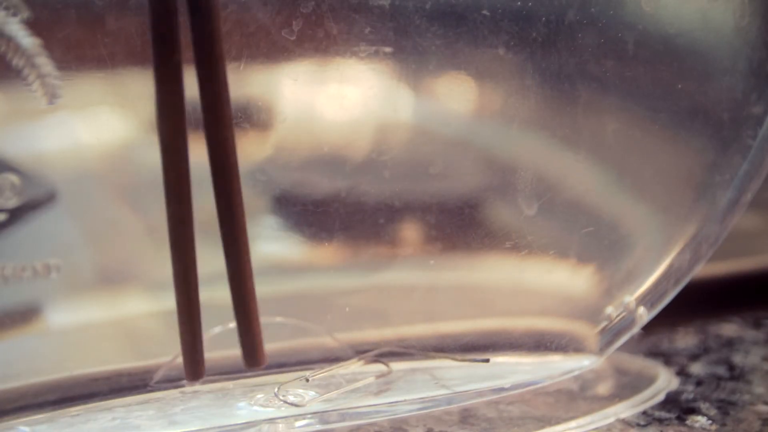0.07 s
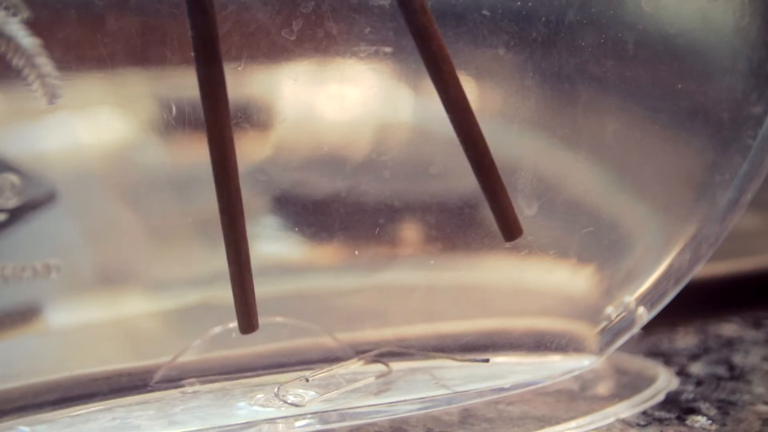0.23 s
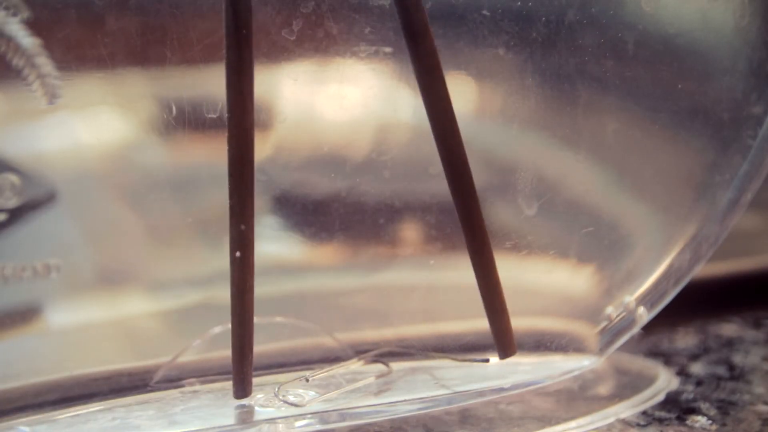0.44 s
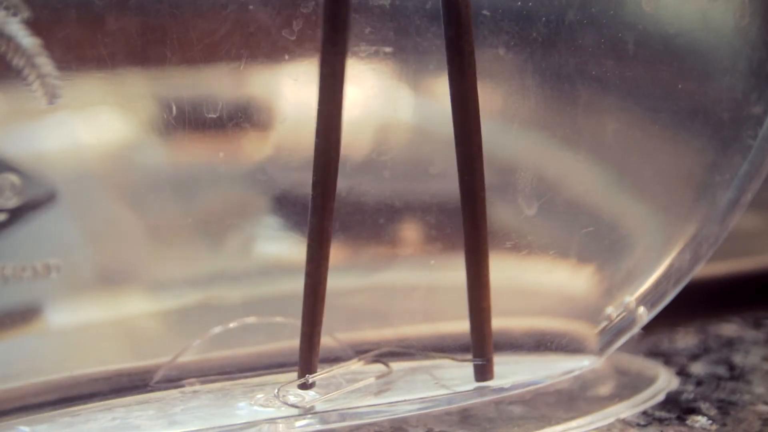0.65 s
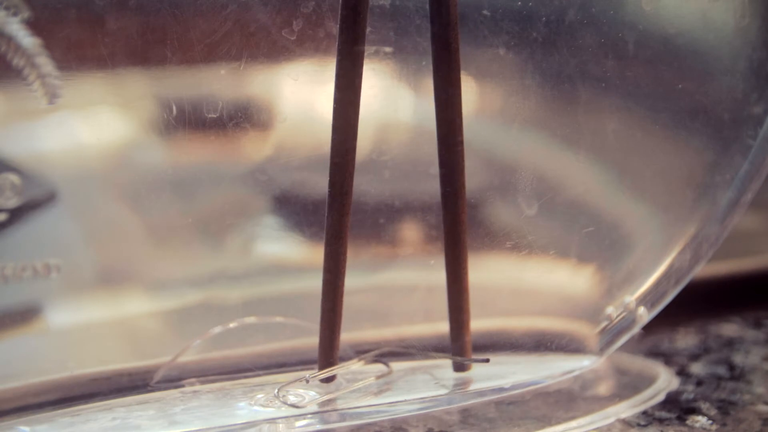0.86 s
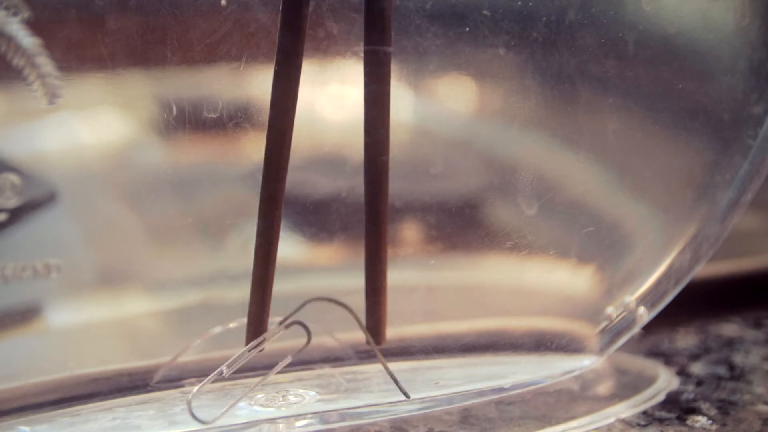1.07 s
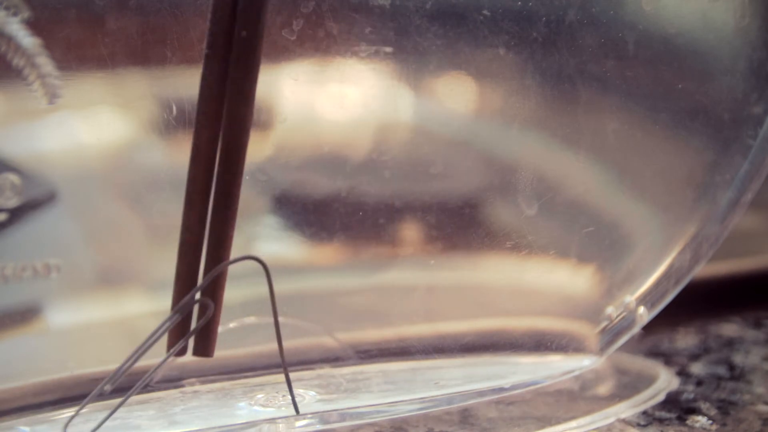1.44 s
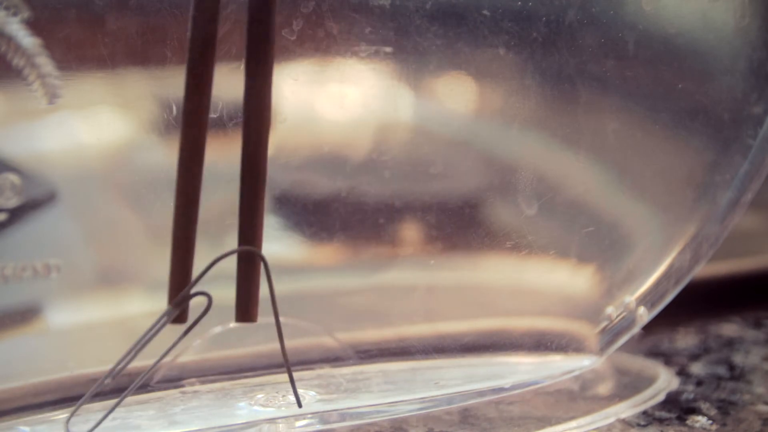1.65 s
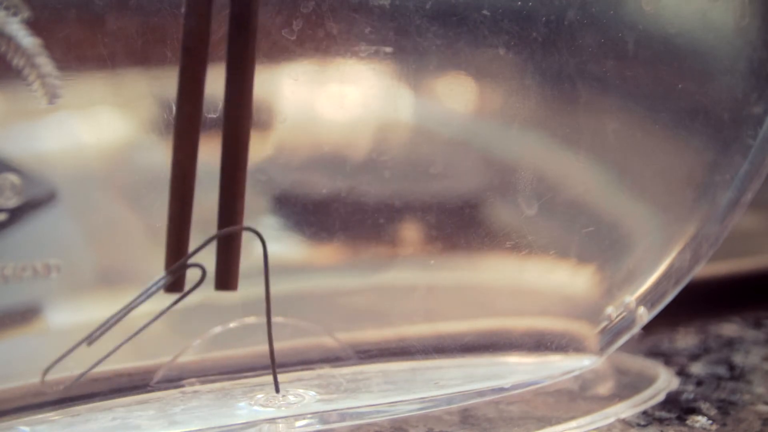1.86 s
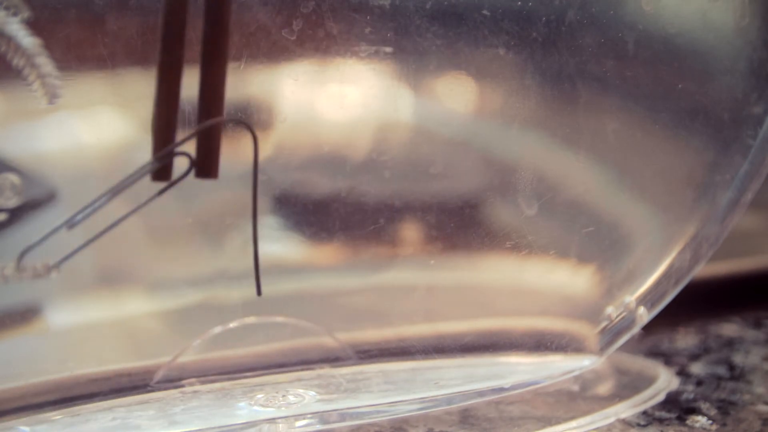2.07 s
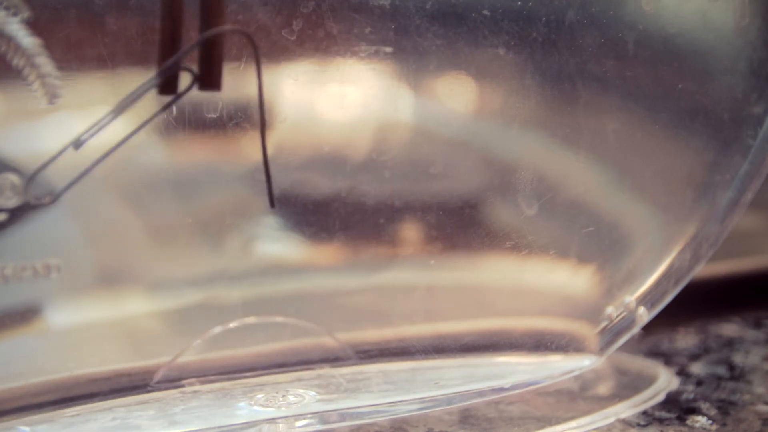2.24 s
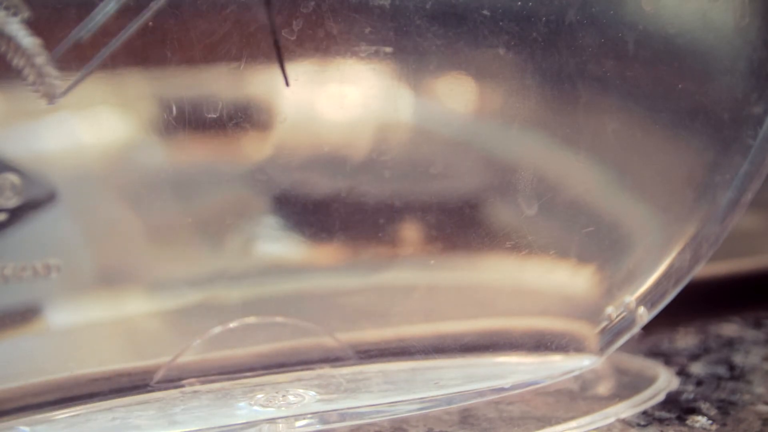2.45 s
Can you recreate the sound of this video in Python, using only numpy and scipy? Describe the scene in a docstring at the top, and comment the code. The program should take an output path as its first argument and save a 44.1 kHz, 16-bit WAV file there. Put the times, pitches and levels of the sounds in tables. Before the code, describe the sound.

Chopsticks tap a glass bowl while a paper clip clinks and scrapes against it.

```python
"""Two wooden chopsticks fish a bent paper clip out of a glass bowl, close up in a small room.
The sticks clack together, knock on the bottom and slide; the wire ticks, scrapes and rings against
the glass, then swings against the sticks. A contact is damped modes plus a short noise burst; sliding
drives both with rough noise. Handling sets off a low boom, and the room gives every touch a short tail."""
import sys
import numpy as np
from scipy import signal
from scipy.fft import rfft, irfft
from scipy.io import wavfile
from scipy.ndimage import uniform_filter1d

SR = 44100
rng = np.random.default_rng(int(sys.argv[2]) if len(sys.argv) > 2 else 0)


def inscribe(sig):
    """Save sig as 16-bit PCM at rate SR to the path in sys.argv[1].

    A 1-D sig is mono; a 2-D sig holds one channel per row.
    Samples are clipped to [-1, 1] before scaling.
    """
    pcm = np.round(np.clip(np.atleast_2d(sig).T, -1, 1) * 32767)
    wavfile.write(sys.argv[1], SR, pcm.astype(np.int16))


N = 110250
RING_T = np.arange(SR) / SR

# Stick on stick. Each row: start in seconds, then level, bass and treble in dB.
STICK_CLACKS = [(0.2389, -5.5, -5.5, 5.5), (0.33, -17, 3, -10)]
# Tip on bowl. Each row: start in seconds, level, bass, presence and treble in dB, impulse share 0-1.
BOWL_KNOCKS = [(0.3884, -13, -1, 0.5, -4, 0.05), (0.429, -25, 4.5, -4.5, -27, 0.27),
               (0.5521, -14.5, -8.5, -15.5, -9, 0.55), (1.606, -38.5, 11, -8, -25, 0.06),
               (1.6844, -32.5, 12.5, 18.5, -2, 0), (1.892, -41, 7, -1, -8, 0.17)]
# Wire on glass, tip on wire. Each row: start in seconds, then level, bass, presence, treble, ring in dB.
WIRE_TICKS = [(0.6672, -25, 4.5, -0.5, -19, 0), (1.0437, -26.5, 9, 2.5, 0, -28),
              (1.052, -26, 5, 3.5, -38, -17), (1.148, -34, -1, 2, 2.5, 9.5), (1.162, -36, 2, -6, 8, -22),
              (1.1801, -21.5, -7.5, -6.5, 6.5, 13), (1.195, -19, -4, 4, -7.5, 2),
              (1.3694, -38.5, 6, 11, 4, 1), (1.3737, -27, -3, 8, 7, -10.5), (1.609, -21, 1.5, -1, -26, -2),
              (1.619, -20.5, 2.5, 0, -3, -3), (1.688, -39.5, -4, -2, 11, -11)]
TIP_CATCHES = [(0.5157, -37, 0, -3, 4, -3), (0.679, -40.5, -18, 4.5, 1, -21),
               (1.6894, -22.5, 7.5, 3.5, -16, -1.5), (1.693, -27.5, 9.5, 10.5, -45, 1)]
# Wire over glass, tips over glass and wire.
# Each row: start, swell and hold in seconds, then level, bass, presence and treble in dB.
WIRE_SCRAPES = [(1.045, 0.044, 0.078, -35, 9.5, -6.5, -18.5), (1.121, 0.02, 0.062, -29.5, -3.5, 4, -10),
                (1.602, 0.00068, 0.0048, -23.5, 4, -0.5, 6.5)]
TIP_SLIDES = [(0.514, 0.001, 0.038, -34, 2.5, 2, -11), (0.545, 0.0017, 0.011, -29.5, 1.5, 2, 0),
              (0.667, 0.004, 0.0088, -34, -9, 7.5, 9), (0.715, 0.0031, .008, -60, 23, 18.5, 22),
              (0.775, 0.02, 0.041, -44, 5, 0.5, 13.5), (0.878, 0.0011, 0.022, -42.5, 8.5, 3.5, 14),
              (0.90, 0.0018, 0.037, -43.5, 7, 3.5, -8), (1.47, 0.013, 0.011, -47.5, -4, 3.5, -28),
              (1.78, 0.021, 0.114, -50.5, -2, 4.5, -7), (2.0, 0.0068, 0.027, -44, -5, 1, -4),
              (2.03, .01, 0.181, -54, -7, 0, -5), (2.335, 0.0031, 0.14, -52, -36, 2, -3)]
# Lifted wire on the sticks. Each row: start in seconds, level and treble in dB, pitch ratio.
WIRE_SWINGS = [(1.8647, -37.5, 6.5, 1), (1.9146, -44.5, 6.5, 1), (1.933, -43.5, 9, 1),
               (1.9605, -41, -11, 0.82), (2.0182, -39.5, 11.5, 1)]
# Handling booms. Each row: start, swell and hold in seconds, level in dB.
HANDLING_BOOMS = [(1.032, 0.012, 0.23, -37.5), (1.61, .01, .03, -39.5), (1.675, 0.018, 0.012, -22.5),
                  (1.771, 0.0054, .11, -28), (1.918, 0.0098, 0.041, -35.5)]

# Modes of each body. Each row: frequency in Hz, level in dB, T60 in seconds.
STICK_RESONANCES = [(856, -25, .07), (1373, -18, .09), (1954, -19, .1), (2541, -22, .08), (3205, -7, .065),
                    (3295, -13, .06), (3350, 1.5, .026), (4124, -17, .055), (4210, -18, .045),
                    (4307, -16, .04), (6385, -19, .025), (8700, -31, .024)]
TIP_RESONANCES = [(375, -17, .22), (590, -20, .2), (770, -14, .16), (1040, -17, .18), (1497, -18, .16),
                  (1981, -13, .2), (2379, -16, .13), (2800, -11, .12), (3470, -12, .13)]
BOWL_RESONANCES = [(300, -21, .6), (808, -17, .22), (855, -20, .28), (919, -20, .18), (1016, -20, .16),
                   (1148, -18, .22), (1215, -15, .18), (1303, -16, .28), (1365, -19, .2), (1416, -17, .18),
                   (1516, -15, .18), (1878, -16, .2), (2000, -18, .16), (2340, -21, .16)]
WIRE_RESONANCES = [(1183, -26, .22), (2293, -23, .17), (2579, -22, .25), (2790, -21, .15), (2896, -21, .2),
                   (3215, -17.5, .2), (3312, -21, .18), (3456, -19.5, .32), (4064, -21, .2),
                   (4161, -24, .2), (4662, -22, .22), (6385, -21, .15), (6493, -21.5, .17),
                   (9006, -24, .14), (10677, -23, .11), (12462, -26, .15)]
HANGING_WIRE_RESONANCES = [(856, -14, .25), (2375, -2, .13), (3595, -3.5, .12), (4050, -15, .08)]
# Spectra of the dense vibration at a contact. Each row: frequency in Hz, level in dB.
STICK_SPECTRUM = [(100, -12.5), (330, 0.5), (460, -23), (700, 4.5), (1000, -6), (1320, 11.5), (1700, -10),
                  (3300, -3), (5000, -11.5), (8000, -20), (15000, -30)]
TIP_SPECTRUM = [(100, -1), (330, -10), (520, -13.5), (1000, 1.5), (1800, -4), (3200, 1), (4000, -4.5),
                (5200, -10.5), (8500, -12.5), (11000, -21), (15000, -29)]
BOWL_SPECTRUM = [(70, -10), (180, -4), (350, -13), (500, -16.5), (720, -6), (950, -2), (1400, 1.5),
                 (2200, -4), (3400, -12.5), (5000, -32), (8000, -48), (15000, -45)]
WIRE_SPECTRUM = [(100, -0.5), (250, -5), (380, -0.5), (560, -12.5), (1100, 1.5), (2000, -2.5), (3300, 2.5),
                 (5300, -7.5), (6500, -2.5), (10000, -5), (15000, -4)]
# Room reverberation. Each row: frequency in Hz, level in dB, T60 in seconds.
ROOM_DECAY = [(100, -6.5, 0.56), (252, -2, 0.73), (550, -3.5, 0.51), (1280, -1.5, 0.29), (2850, -7, 0.29),
              (5800, -8.5, 0.44), (14000, -17, 0.23)]
# Spectra of room tone and handling rumble. Each row: frequency in Hz, level in dB.
ROOM_TONE_SPECTRUM = [(20, -12.5), (45, 2.5), (80, -9.5), (120, -3), (180, -18), (300, -21), (500, -25),
                      (1000, -24.5), (2000, -27.5), (3200, -25), (5000, -41), (9000, -42.5), (15500, -40.5)]
RUMBLE_SPECTRUM = [(25, -17), (80, -4), (200, -27), (600, -62), (2000, -80)]


def amp(db):
    """Decibels to gain."""
    return 10 ** (np.asarray(db) / 20)


def unit_rms(x):
    """Scale to RMS 1."""
    return x / np.sqrt(np.mean(x ** 2))


def log_interp(hz, points_hz, values):
    """Interpolate on a log-frequency axis."""
    return np.interp(np.log(hz + 1e-3), np.log(points_hz), values)


def convolve(x, response):
    """Convolve, keeping the length of x."""
    return signal.fftconvolve(x, response)[:len(x)]


def min_phase(spectrum, size=4096):
    """Minimum-phase impulse response of a (Hz, dB) curve."""
    hz, db = np.array(spectrum).T
    gain = amp(log_interp(np.fft.rfftfreq(size, 1 / SR), hz, db))
    cepstrum = irfft(np.log(gain))
    cepstrum[1:size // 2] *= 2
    cepstrum[size // 2 + 1:] = 0
    return irfft(np.exp(rfft(cepstrum)))


def tone(x, bass_db, presence_db, treble_db):
    """Colour given by the place and hardness of a contact."""
    curve = [(350, bass_db), (1100, 0), (3000, presence_db), (4500, presence_db), (11000, treble_db)]
    return convolve(x, min_phase(curve))


def add(out, start_s, x):
    """Mix x into out at start_s."""
    i = int(start_s * SR)
    out[i:i + len(x)] += x[:N - i]


def envelope(swell_s, hold_s, release_s):
    """Linear swell, hold, exponential release."""
    release = np.exp(-np.maximum(RING_T - swell_s - hold_s, 0) / release_s)
    return np.minimum(RING_T / swell_s, 1) * release


def fade(t60_s):
    """Free decay."""
    return np.exp(-np.log(1000) * RING_T / t60_s)


def ring(modes, scatter_db=2):
    """Damped modes of alternating sign; levels scatter with the place of contact."""
    offsets_db = scatter_db * rng.standard_normal(len(modes))
    return sum((-1) ** k * amp(db + offsets_db[k]) * fade(t60_s) * np.sin(2 * np.pi * hz * RING_T)
               for k, (hz, db, t60_s) in enumerate(modes))


def crack(spectrum, t60_s, impulse_share=0.11, damping_hz=5800):
    """An impulse, then dense vibration that dies quickly, treble first."""
    noise = rng.standard_normal(SR)
    low = signal.sosfiltfilt(signal.butter(2, damping_hz, fs=SR, output="sos"), noise)
    burst = low * fade(t60_s) + (noise - low) * fade(0.55 * t60_s)
    energy = np.sum(burst ** 2)
    burst *= np.sqrt(1 - impulse_share)
    burst[0] += np.sqrt(impulse_share * energy)
    body = min_phase(spectrum)
    return convolve(burst, body / np.linalg.norm(body))


def rub(strokes, modes, spectrum, crack_t60_s, roughness_db=0.5):
    """Sliding: a dense run of tiny uneven slips excites the body."""
    out = np.zeros(N)
    for start_s, swell_s, hold_s, db, *tone_db in strokes:
        slips = unit_rms(rng.standard_normal(SR) * amp(roughness_db * rng.standard_normal(SR)))
        force = slips * envelope(swell_s, hold_s, release_s=0.0031)
        body = ring(modes) + crack(spectrum, crack_t60_s)
        slide = convolve(force, body / np.linalg.norm(body))
        add(out, start_s, amp(db) * tone(slide, *tone_db))
    return out


def room_tone(level_db=-46.5):
    """Quiet steady noise, strongest in the bass."""
    return amp(level_db) * unit_rms(convolve(rng.standard_normal(N), min_phase(ROOM_TONE_SPECTRUM)))


def room_tail(x, onset_s=0.011):
    """Diffuse echoes in half-octave bands; the bass stays longest."""
    hz, db, t60_s = np.array(ROOM_DECAY).T
    noise_bins, bin_hz = rfft(rng.standard_normal(SR)), np.fft.rfftfreq(SR, 1 / SR)
    tail = np.zeros(SR)
    for low_hz in 50 * 2 ** (np.arange(17) / 2):
        centre_hz = low_hz * 2 ** 0.25
        decay = fade(log_interp(centre_hz, hz, t60_s))
        band = irfft(noise_bins * ((bin_hz >= low_hz) & (bin_hz < low_hz * np.sqrt(2))))
        tail += amp(log_interp(centre_hz, hz, db)) * band * decay / np.linalg.norm(decay)
    return convolve(x, tail * np.minimum(RING_T / onset_s, 1))


def handling_booms(boom_hz=47.3, wander_depth=0.11, rumble_db=-14.5):
    """A wavering low resonance with rumble as things are pushed about."""
    out = np.zeros(N)
    for start_s, swell_s, hold_s, db in HANDLING_BOOMS:
        wander = unit_rms(uniform_filter1d(rng.standard_normal(SR), size=2200))
        pitch_hz = boom_hz * (1 + wander_depth * wander)
        rumble = unit_rms(convolve(rng.standard_normal(SR), min_phase(RUMBLE_SPECTRUM)))
        boom = np.sin(2 * np.pi * np.cumsum(pitch_hz) / SR) + amp(rumble_db) * rumble
        add(out, start_s, amp(db) * envelope(swell_s, hold_s, release_s=0.031) * boom)
    return out


def hanging_wire(crack_db=-1.5, swell_s=0.0017):
    """The lifted paper clip grazes the sticks and rings thinly; pitch shifts with the grip."""
    out = np.zeros(N)
    for start_s, db, treble_db, pitch_ratio in WIRE_SWINGS:
        modes = [(hz * pitch_ratio, mode_db, t60_s) for hz, mode_db, t60_s in HANGING_WIRE_RESONANCES]
        tick = ring(modes) + amp(crack_db) * crack(TIP_SPECTRUM, t60_s=0.084)
        tick *= np.minimum(RING_T / swell_s, 1)
        add(out, start_s, amp(db) * tone(tick, bass_db=0, presence_db=3, treble_db=treble_db))
    return out


def stick_tips(crack_t60_s=0.075):
    """Wooden tips slide and catch on the wire; most catches ring briefly, one is a dry tick."""
    out = rub(TIP_SLIDES, TIP_RESONANCES, TIP_SPECTRUM, crack_t60_s)
    for start_s, db, *tone_db, ring_db in TIP_CATCHES:
        catch = amp(ring_db) * ring(TIP_RESONANCES) + crack(TIP_SPECTRUM, crack_t60_s)
        add(out, start_s, amp(db) * tone(catch, *tone_db))
    return out


def wire_on_glass(crack_db=2.5, crack_t60_s=0.078):
    """The paper clip scrapes and taps the glass; it rings less when pinched."""
    out = rub(WIRE_SCRAPES, WIRE_RESONANCES, WIRE_SPECTRUM, crack_t60_s)
    for start_s, db, *tone_db, ring_db in WIRE_TICKS:
        tap = amp(ring_db) * ring(WIRE_RESONANCES) + amp(crack_db) * crack(WIRE_SPECTRUM, crack_t60_s)
        add(out, start_s, amp(db) * tone(tap, *tone_db))
    return out


def bowl_knocks(ring_db=-1, crack_db=4.5):
    """Wooden tips knock on the bottom of the bowl, which already rings faintly at the start."""
    out = np.zeros(N)
    ringing = amp(ring_db) * ring(BOWL_RESONANCES, scatter_db=0)
    add(out, 0, amp(-33.5) * tone(ringing, bass_db=14, presence_db=-9, treble_db=-1))
    for start_s, db, *tone_db, share in BOWL_KNOCKS:
        knock = ringing + amp(crack_db) * crack(BOWL_SPECTRUM, t60_s=0.06, impulse_share=share)
        add(out, start_s, amp(db) * tone(knock, *tone_db))
    return out


def stick_clacks(crack_db=-4.5):
    """The chopsticks strike each other: hard wood snaps and rings briefly."""
    out = np.zeros(N)
    ringing = ring(STICK_RESONANCES, scatter_db=0)
    for start_s, db, bass_db, treble_db in STICK_CLACKS:
        clack = ringing + amp(crack_db) * crack(STICK_SPECTRUM, t60_s=0.043, impulse_share=0.15)
        add(out, start_s, amp(db) * tone(clack, bass_db, 0, treble_db))
    return out


def scene():
    """Mono mix: each group of contacts with its own echoes, over room tone and booms."""
    groups = (stick_clacks(), bowl_knocks(), wire_on_glass(), stick_tips() + hanging_wire())
    contacts = sum(x + room_tail(x) for x in groups)
    return (contacts + room_tone() + handling_booms())[None]


def record(dry):
    """Soft peak limiting, then a steep low-pass."""
    cutoff_hz = 15750
    return signal.sosfilt(signal.ellip(10, .2, 80, cutoff_hz, fs=SR, output="sos"), np.tanh(dry))


dry = scene()
out = record(dry)
inscribe(out)
```